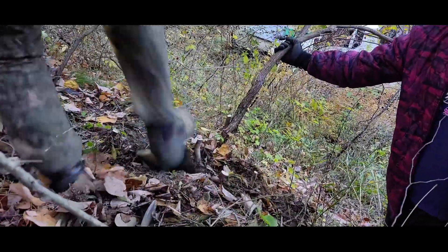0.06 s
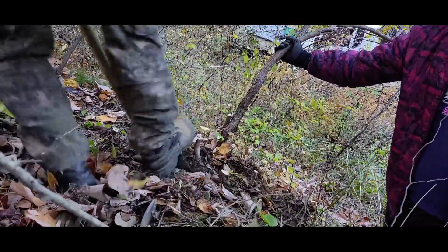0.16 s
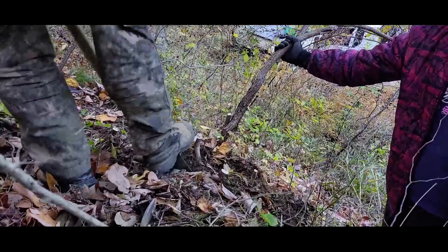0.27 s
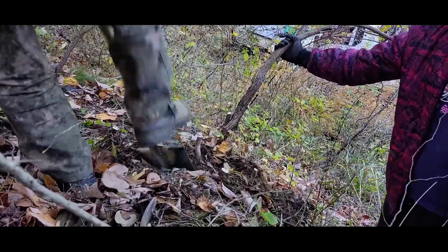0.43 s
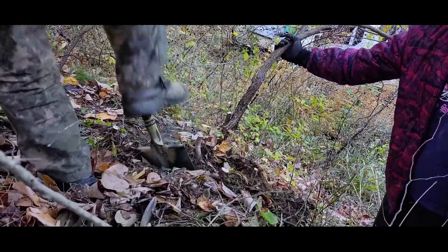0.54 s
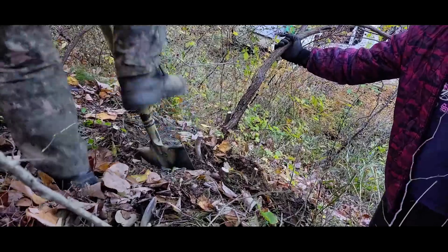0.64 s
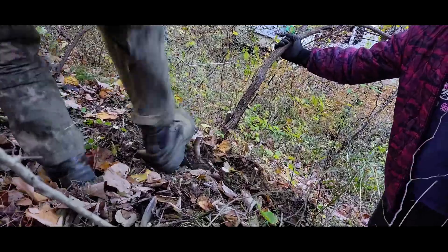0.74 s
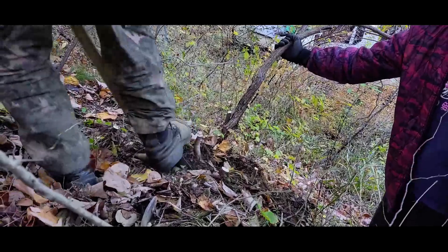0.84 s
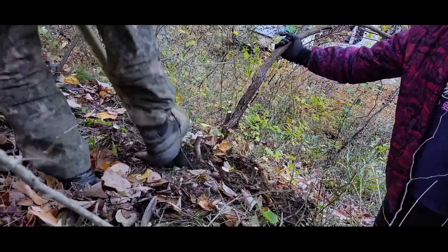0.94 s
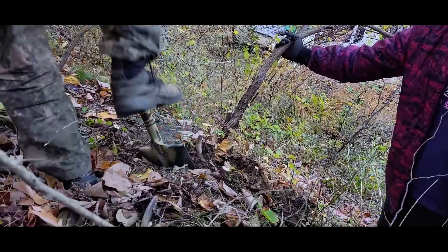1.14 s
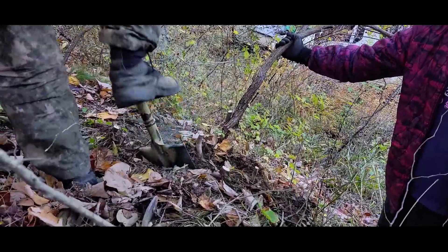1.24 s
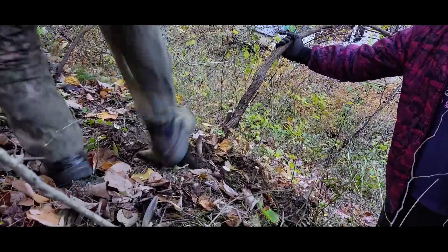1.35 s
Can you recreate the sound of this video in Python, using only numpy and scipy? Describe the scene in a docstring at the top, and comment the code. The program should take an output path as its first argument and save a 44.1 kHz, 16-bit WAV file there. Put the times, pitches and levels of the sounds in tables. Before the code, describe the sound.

A boot stamps on a steel spade twice, thudding into soil with crunching leaf litter and a brief metallic knock; dry leaves rustle between and after. Close outdoor woodland sound, nearly dry, duller on the right.

```python
"""A boot stamps twice on a steel spade in leafy forest soil: sinking sine thuds with ground boom and shaft ring.
Bursts of coloured noise crunch the litter; random grains over hiss rustle as the weight shifts in dry leaves.
Low noise crumbles and rumbles. The boot knocks the blade, a set of decaying modes, during both stamps and once
more near the end, where a short rising tone groans like a rubbing sole. All is close and outdoors; the right
microphone is shaded and hears it later, and the trees answer as a faint diffuse tail."""
import sys
import numpy as np
from scipy import signal
from scipy.fft import rfft, irfft, next_fast_len
from scipy.io import wavfile
from scipy.ndimage import map_coordinates

SR = 44100
rng = np.random.default_rng(int(sys.argv[2]) if len(sys.argv) > 2 else 0)


def digitize_waveform(pressure):
    """Quantize a signal to 16-bit integers and store it at the path in sys.argv[1].

    Rows of a 2-D input are taken as channels; values are limited to [-1, 1].
    """
    field = np.atleast_2d(pressure).T
    bounded = np.clip(field, -1, 1)
    quanta = np.round(bounded * 32767).astype(np.int16)
    wavfile.write(sys.argv[1], SR, quanta)


N = 61739  # length in samples

# movement in the leaves: t/s, level/dB
RUSTLE_LEVEL = [(0, -55), (.05, -66), (.1, -62), (.135, -48), (.195, -39), (.27, -41.5), (.335, -35.5),
                (.375, -49.5), (.455, -48), (.55, -62.5), (.61, -62), (.66, -56), (.74, -59.5),
                (.78, -45.5), (.87, -44.5), (.895, -51), (.945, -41.5), (1.0, -59.5), (1.025, -58.5),
                (1.055, -49.5), (1.105, -46), (1.155, -62.5), (1.245, -60.5), (1.275, -41), (1.34, -43),
                (1.4, -43.5)]
# tone colour of the leaves: f/Hz, level/dB
LEAF_COLOUR = [(200, -6), (600, 1), (1200, -1), (2500, 1.5), (5000, 3), (8500, 2), (11500, 3), (16000, -1)]
# soil shifting round the blade: t/s, level/dB
CRUMBLE_LEVEL = [(0, -73.5), (.125, -80.5), (.2, -43.5), (.25, -36.5), (.29, -39.5), (.335, -45.5),
                 (.37, -61.5), (.45, -65.5), (.53, -80), (.73, -80), (.83, -78.5), (.865, -35), (.93, -44),
                 (1.0, -58), (1.04, -66.5), (1.1, -66), (1.16, -70.5), (1.26, -74), (1.4, -69)]
# tone colour of the crumbling earth: f/Hz, level/dB
EARTH_COLOUR = [(25, -29.5), (70, -4), (130, 1), (210, -9), (330, -9.5), (480, -5), (800, -12.5),
                (1500, -16.5), (4000, -33)]
# low swells, probably the ground flexing under the shifting weight: t/s, level/dB
RUMBLE_LEVEL = [(0, -69), (.035, -62), (.1, -76), (.3, -47.5), (.42, -75), (.55, -81), (.68, -71.5),
                (.78, -61), (.95, -74), (1.04, -75), (1.1, -63), (1.2, -86.5), (1.4, -76.5)]
# tone colour of the rumble: f/Hz, level/dB
RUMBLE_COLOUR = [(20, -4.5), (55, -2), (80, -4.5), (160, -35.5), (600, -71.5)]
# crunches and twig snaps: t/s, level/dB, t60/s, centre f/Hz, fall one octave from the centre/dB
SNAPS = [(0.1139, -37.5, 0.018, 8300, 8.5), (0.2128, -22.5, 0.12, 706, 0.95),
         (0.2229, -15.5, 0.016, 9500, 2), (0.2365, -12, 0.019, 2500, 0.57),
         (0.2423, -36.5, 0.12, 2940, 4.7), (0.2647, -28, 0.028, 1000, 0.8), (0.503, -41, 0.013, 7140, 4),
         (0.8452, -24.5, 0.07, 1990, 0.6), (0.8547, -25.5, 0.013, 10020, 11.5),
         (0.865, -29.5, 0.021, 1015, 0), (0.8925, -25.5, 0.011, 1000, 2), (0.9566, -28, 0.0134, 596, 7),
         (1.062, -41.5, 0.019, 2000, 3), (1.248, -39.5, 0.037, 2990, 7), (1.328, -29, 0.014, 5030, 12.5),
         (1.376, -35, 0.045, 6000, 6), (1.38, -44, 0.11, 1600, 26)]
# tone colour shared by crunches and snaps: f/Hz, level/dB
CRUNCH_COLOUR = [(150, -37.5), (500, 21), (850, 12), (1300, 6.5), (2400, 8), (3100, -1), (5000, 3.5),
                 (9000, -4), (12000, 6), (16000, -7.5)]
# blows in the soil: t/s, level/dB, first f/Hz, last f/Hz, t60/s, rise/s,
# shaft ring level/dB, shaft f/Hz, ground boom level/dB
THUDS = [(.2148, 6, 243, 120.4, 0.025, 0.0015, -9.5, 405, -20.5),
         (0.2377, -3, 249, 125, 0.03, 0.00038, -1, 459, -25),
         (0.324, -26.5, 215.5, 178, 0.054, .003, -54, 480, -48),
         (0.8458, -2.5, 198.7, 159.6, 0.0485, 0.002, -3, 434, -18),
         (0.9534, -13, 206.3, 130, 0.024, 0.00082, -15.5, 413, -43.5)]
# knocks on the blade: t/s, level/dB
KNOCKS = [(0.2405, -36.5), (0.264, -37), (.847, -33), (0.8893, -39), (1.2834, -33.5)]
# ringing modes of the steel blade: f/Hz, level/dB, t60/s
BLADE_MODES = [(486.5, -17, 0.076), (640, -12, .06), (795, -12.5, .07), (918, -7, 0.21), (1305, 1.5, 0.084),
               (1618, 0, 0.1), (2366, -20.5, 0.086)]
# the groan: t/s, f/Hz, level/dB
GROAN = [(1.292, 265.7, -76), (1.303, 244, -45), (1.315, 257, -43.5), (1.329, 236, -48.5),
         (1.345, 310, -50), (1.372, 298.3, -47), (1.386, 355, -61), (1.4, 350, -51)]
# tone colour of the background air: f/Hz, level/dB
AIR_COLOUR = [(20, 7), (55, 0.5), (110, -16), (250, -22.5), (450, -14), (700, -24.5), (1500, -33.5),
              (16000, -47.5)]
# shading of the right microphone: f/Hz, level/dB
SHADE = [(55, 7.5), (130, 1), (250, -2), (450, -2.5), (800, -10), (1400, -14.5), (2100, -13.5),
         (2600, -15.5), (3300, -5.5), (4300, -19.5), (6200, -19.5), (8000, -41), (10500, -19.5),
         (12500, -10), (14500, -4.5)]
# litter power reaching the right side by other paths: f/Hz, share/0-1
SCATTER = [(100, 0.44), (1000, 1), (4000, 1), (12000, 1)]

GRAINS_PER_S = 2100
GRAIN_SPREAD = 0.5  # spread of the natural log of grain size
GRAIN_SHARE = 0.34  # crackle's share of the rustle's power, the rest is hiss
FLUTTER_DB = 1.28
DIP_S, DIP_HALF_WIDTH_S, DIP_DB = .8378, 0.0061, -41  # a very brief dip in level just before the second stamp
SNAP_RISE_S = .0005
SAG_S = 0.008  # the pitch of a thud sinks as the soil gives
GROUND_HZ, GROUND_T60_S, GROUND_RISE_S = 61, 0.18, 0.0062
SHAFT_T60_S = .019
BLADE_ROUGH_RAD = .5
GROAN_JITTER, OVERTONE_DB = 0.0087, -36  # jitter is a fraction of the pitch
AIR_DB = -76
WOODS_DB, WOODS_T60_S = -30.5, .3
LAG_S = .00032  # delay of the right side
LEFT_LOW_CUT_HZ, LOW_CUT_HZ, TOP_HZ = 41, 38, 15950


def amp(db):
    """Decibels to gain."""
    return 10 ** (np.asarray(db) / 20)


def unit(x):
    """Scale to rms 1."""
    return x / np.sqrt(np.mean(x ** 2) + 1e-20)


def along(points, hz):
    """Read (f/Hz, value) points on a log frequency axis."""
    f, v = np.transpose(points)
    return np.interp(np.log(hz + 1), np.log(f + 1), v)


def since(s):
    """Seconds since s, zero before it."""
    return np.maximum(np.arange(N) / SR - s, 0)


def curves(rows):
    """One value per sample for each column after the time."""
    s, *columns = np.transpose(rows)
    return [np.interp(since(0), s, column) for column in columns]


def wobble(rate):
    """A smooth random curve, rate knots a second."""
    return map_coordinates(rng.standard_normal(N), [since(0) * rate])


def filtered(x, response):
    """x times a complex response of frequency."""
    m = next_fast_len(N + SR // 2)  # padding leaves room for the filter's ringing
    spectrum = rfft(x, m) * response(np.fft.rfftfreq(m, 1 / SR))
    return irfft(spectrum, m)[..., :N]


def noise(colour, centre_hz=1000, fall_db=0):
    """Coloured noise of rms 1; a fall above 0 dB weakens it on both sides of the centre."""
    def response(hz):
        octaves = np.log2((hz + 1) / centre_hz)
        return amp(along(colour, hz) - fall_db * octaves ** 2)

    return unit(filtered(rng.standard_normal(N), response))


def strike(t, rise, t60):
    """Quick rise and exponential decay."""
    return (1 - np.exp(-t / rise)) * np.exp(-np.log(1000) * t / t60)


def leaves():
    """Dry leaves rub in dense tiny crackles over a hiss; their common level slides and flutters."""
    hits = rng.random(N) < GRAINS_PER_S / SR
    sizes = np.exp(GRAIN_SPREAD * rng.standard_normal(N))
    grains = hits * rng.choice([-1, 1], N) * sizes
    crackle = unit(filtered(grains, lambda hz: amp(along(LEAF_COLOUR, hz))))
    hiss = noise(LEAF_COLOUR)
    level_db, = curves(RUSTLE_LEVEL)
    # the sixth power gives the dip a flat floor and steep sides
    dip_db = DIP_DB * np.exp(-((since(0) - DIP_S) / DIP_HALF_WIDTH_S) ** 6)
    level = amp(level_db + dip_db + FLUTTER_DB * wobble(120))
    return level * (np.sqrt(GRAIN_SHARE) * crackle + np.sqrt(1 - GRAIN_SHARE) * hiss)


def soil():
    """Dull noise crumbles while the blade sinks, over a faint low rumble."""
    crumble_db, = curves(CRUMBLE_LEVEL)
    rumble_db, = curves(RUMBLE_LEVEL)
    crumble = amp(crumble_db) * noise(EARTH_COLOUR)
    rumble = amp(rumble_db) * noise(RUMBLE_COLOUR)
    return crumble + rumble


def snaps():
    """Litter crushed under the edge and small twigs breaking, each a decaying burst of noise."""
    out = np.zeros(N)
    for s, db, t60, centre_hz, fall_db in SNAPS:
        burst = strike(since(s), SNAP_RISE_S, t60)
        out += amp(db) * burst * noise(CRUNCH_COLOUR, centre_hz, fall_db)
    return out


def thuds():
    """Each blow is a soft-edged thud of sinking pitch, with the ground's boom and the shaft's short ring."""
    out = np.zeros(N)
    for s, db, first_hz, last_hz, t60, rise, shaft_db, shaft_hz, ground_db in THUDS:
        t = since(s)
        # cycles of a pitch gliding exponentially from first to last
        turns = last_hz * t + (first_hz - last_hz) * SAG_S * (1 - np.exp(-t / SAG_S))
        body = amp(db) * strike(t, rise, t60) * np.sin(2 * np.pi * turns)
        boom = amp(ground_db) * strike(t, GROUND_RISE_S, GROUND_T60_S) * np.sin(2 * np.pi * GROUND_HZ * t)
        shaft = amp(shaft_db) * strike(t, rise, SHAFT_T60_S) * np.sin(2 * np.pi * shaft_hz * t)
        soft_edge = np.tanh(t / rise)
        out -= soft_edge * (body + boom + shaft)  # the first swing is negative
    return out


def blade():
    """The steel rings briefly in modes of unsteady phase, damped by the soil."""
    out = np.zeros(N)
    for s, db in KNOCKS:
        t = since(s)
        for hz, mode_db, t60 in BLADE_MODES:
            phase = 2 * np.pi * (hz * t + rng.random()) + BLADE_ROUGH_RAD * wobble(280)
            out += amp(db + mode_db) * strike(t, SNAP_RISE_S, t60) * np.sin(phase)
    return out


def groan():
    """An unsteady rising tone with a faint octave, probably the sole slipping on the tread."""
    hz, level_db = curves(GROAN)
    unsteady_hz = hz * (1 + GROAN_JITTER * wobble(300))
    phase = 2 * np.pi * np.cumsum(unsteady_hz) / SR
    tone = np.sin(phase) + amp(OVERTONE_DB) * np.sin(2 * phase)
    started = since(GROAN[0][0]) > 0
    return started * amp(level_db) * tone


def echo(x, t60):
    """Diffuse reflections: the sound smeared by a decaying noise tail of unit energy."""
    tail = rng.standard_normal(N) * strike(since(0), t60 / 20, t60)
    return signal.fftconvolve(x, tail / np.linalg.norm(tail))[:N]


def low_cut(hz, corner_hz):
    """First-order high-pass response."""
    return 1j * hz / (corner_hz + 1j * hz)


def scene():
    """The left side gets a bass cut, the right side is late and shaded; trees and air join both."""
    spade = thuds() + blade() + groan() + soil()
    litter = leaves() + snaps()
    scattered = leaves() + snaps()  # same events with fresh grain, for the other paths

    left = filtered(spade + litter, lambda hz: low_cut(hz, LEFT_LOW_CUT_HZ) ** 2)

    direct_litter = filtered(litter, lambda hz: np.sqrt(1 - along(SCATTER, hz)))
    scattered_litter = filtered(scattered, lambda hz: np.sqrt(along(SCATTER, hz)))
    right = spade + direct_litter + scattered_litter
    right = filtered(right, lambda hz: amp(along(SHADE, hz)) * np.exp(-2j * np.pi * hz * LAG_S))

    sides = []
    for side in (left, right):
        woods = amp(WOODS_DB) * echo(side, WOODS_T60_S)
        air = amp(AIR_DB) * noise(AIR_COLOUR)
        sides.append(side + woods + air)
    return np.array(sides)


def record(dry):
    """The deepest bass is cut and nothing is kept above the band limit."""
    return filtered(dry, lambda hz: low_cut(hz, LOW_CUT_HZ) ** 2 * (hz < TOP_HZ))


dry = scene()
out = record(dry)
digitize_waveform(out)
```